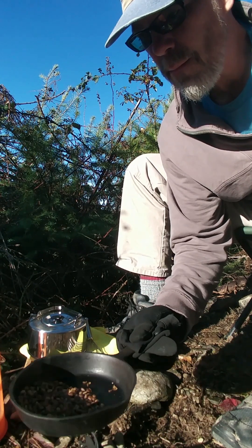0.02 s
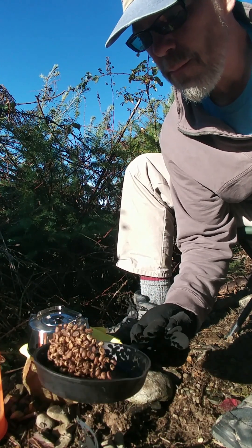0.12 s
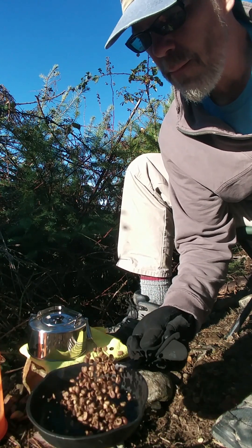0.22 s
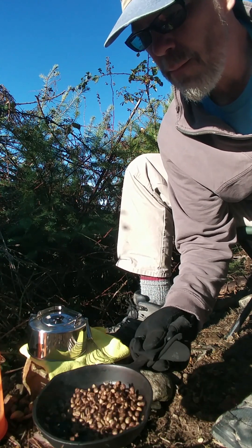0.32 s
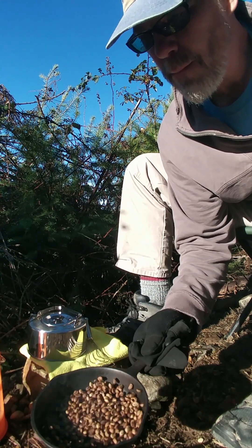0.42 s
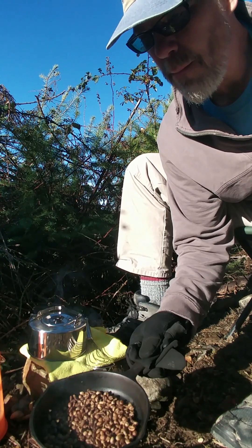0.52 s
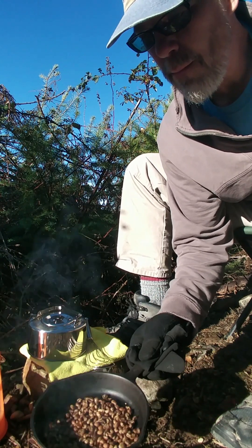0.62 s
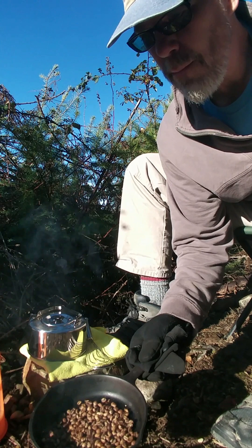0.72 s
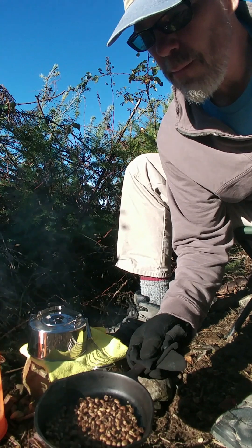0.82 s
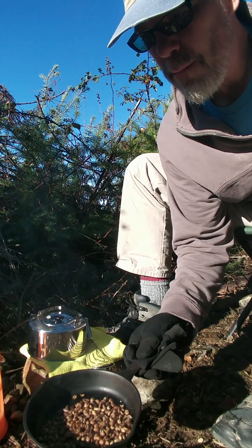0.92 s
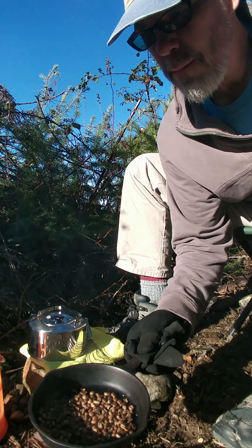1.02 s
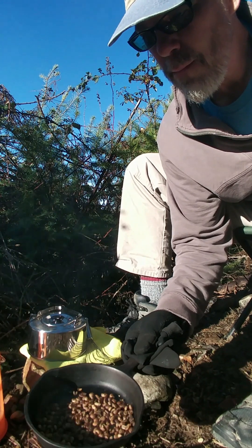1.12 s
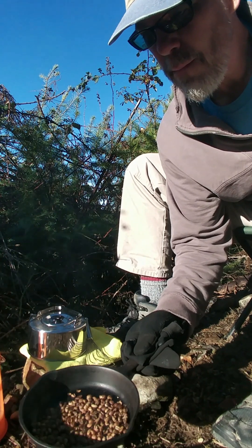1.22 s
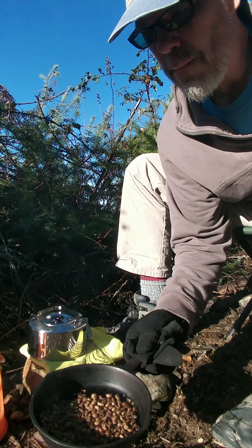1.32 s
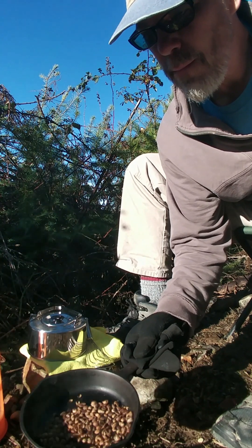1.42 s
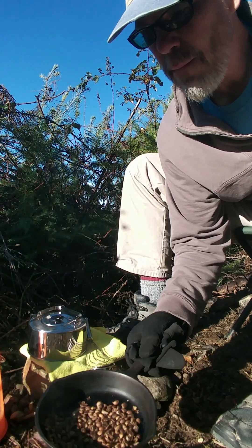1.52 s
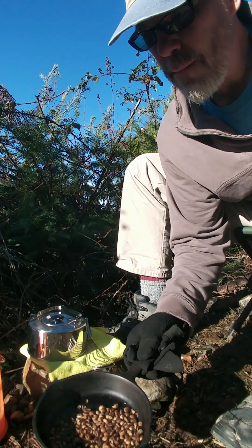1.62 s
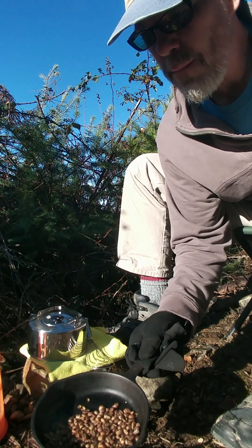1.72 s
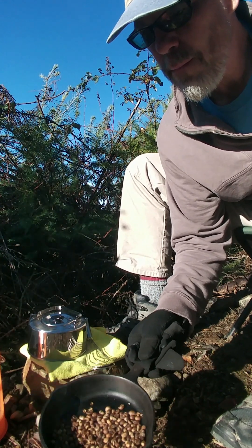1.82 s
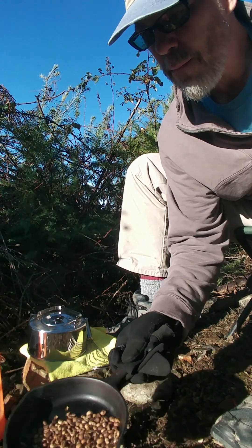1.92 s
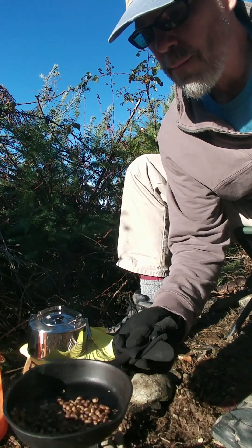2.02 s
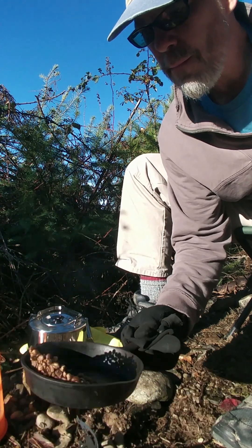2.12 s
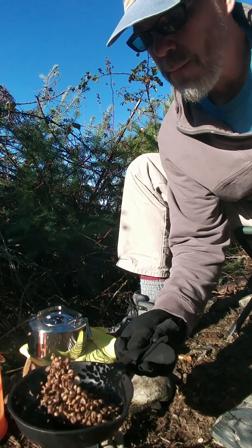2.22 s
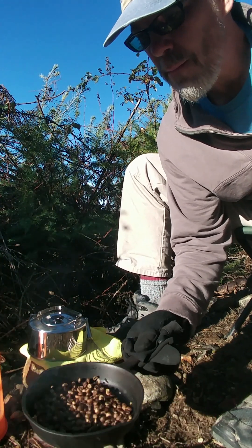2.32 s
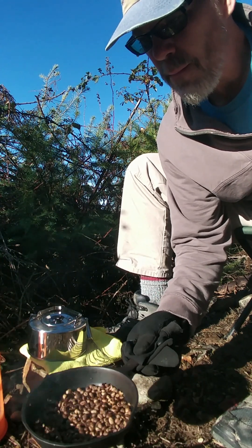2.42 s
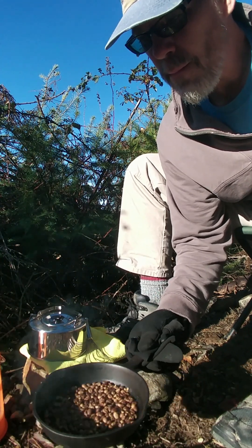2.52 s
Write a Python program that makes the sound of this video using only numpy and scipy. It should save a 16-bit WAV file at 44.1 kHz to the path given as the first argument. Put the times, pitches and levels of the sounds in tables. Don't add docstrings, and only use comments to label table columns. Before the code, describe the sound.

Coffee beans slide in a small metal pan with a bright ringing scrape, then rest; one bean cracks sharply, then a second, softer slide. Low stove rumble and faint hiss outdoors, close stereo phone microphone.

```python
import sys
import numpy as np
from scipy import signal
from scipy.fft import rfft, irfft
from scipy.io import wavfile
from scipy.ndimage import uniform_filter1d

SR = 44100
rng = np.random.default_rng(int(sys.argv[2]) if len(sys.argv) > 2 else 0)


def pcm_store(signal):
    levels = np.round(np.clip(np.atleast_2d(signal), -1, 1) * 32767)
    wavfile.write(sys.argv[1], SR, levels.astype(np.int16).T)


def volts_from_db(level):
    exponent = np.asarray(level, float) / 20
    return 10 ** exponent


N = 114660
T = np.arange(N) / SR
FREQS = np.fft.rfftfreq(N, 1 / SR)
PORT_LAG_MS = 0.3166


def noise():
    return rng.standard_normal(N)


def unit(x):
    return x / np.sqrt(np.mean(x ** 2))


def late(x, ms):
    return irfft(rfft(x) * np.exp(-2j * np.pi * FREQS * ms / 1000), N)


def ports(x, other, apart, ms):
    share = np.clip(apart, 0, 1)
    left = np.sqrt(1 - share) * x + np.sqrt(share) * other
    return np.array([late(left, ms), x])


def mode(x, hz, t60):
    pole = np.exp(2j * np.pi * hz / SR - np.log(1000) / (t60 * SR))
    return signal.lfilter([1], [1, -pole], x)


def colour(x, table):
    hz, db = np.array(table).T
    return irfft(rfft(x) * volts_from_db(np.interp(np.log(FREQS + 1), np.log(hz), db)), N)


def band(x, hz, width):
    return irfft(rfft(x) / (1 + (2 * (FREQS - hz) / width) ** 2), N)


def walk(rate):
    hold = int(SR / rate)
    steps = np.repeat(rng.standard_normal(N // hold + 1), hold)
    smooth = uniform_filter1d(uniform_filter1d(steps, hold), hold)
    return unit(smooth[:N])


def bean_motion():
    # (time [s], level [dB], place [-1 middle to 1 rim])
    slide_1 = [
        (0.192, -47.5, -2.1),
        (0.227, -33, -3.2),
        (0.251, -15.5, -0.54),
        (0.283, -21.5, 0.35),
        (0.323, -20, 1.4),
        (0.351, -25.5, 0.85),
        (0.373, -38, .3),
        (.45, -44, -0.032),
        (0.641, -63, 0.56),
    ]
    slide_2 = [
        (2.171, -61, -2),
        (2.205, -46, -3.4),
        (2.227, -27, -1.77),
        (2.263, -24, 0),
        (2.297, -20.5, -0.84),
        (2.324, -37.5, 0.6),
        (2.381, -44, -0.5),
        (2.462, -43, 0),
        (2.521, -69, 0.2),
    ]
    # (time [s], level [dB])
    creep = [
        (0, -42.5),
        (.05, -71),
        (.9, -63.5),
        (1.1, -58.5),
        (1.3, -67),
        (1.4, -58.5),
        (1.58, -60),
        (1.65, -55.5),
        (1.71, -64.5),
        (2.6, -64),
    ]
    rest_place, lead_s = 0.2, 0.0031
    ahead = T + lead_s
    rows = np.array(slide_1 + slide_2)
    moving = sum((ahead > s[0][0]) & (ahead < s[-1][0]) for s in (slide_1, slide_2))
    sliding = moving * volts_from_db(np.interp(ahead, rows[:, 0], rows[:, 1]))
    place = np.where(moving, np.interp(ahead, rows[:, 0], rows[:, 2]), rest_place)
    creeping = volts_from_db(np.interp(T, *np.array(creep).T))
    tilted = T > slide_2[0][0]
    return sliding, place, creeping, tilted


def rung(drive, hz, t60):
    evenness, window = 0.6, int(0.03 * SR)
    ring = mode(drive * noise(), hz, t60)
    expected = uniform_filter1d(mode(drive ** 2, 0, t60 / 2).real, window) + 1e-16
    actual = uniform_filter1d(abs(ring) ** 2, window) + 1e-16
    return ring * (expected / actual) ** (evenness / 2) * np.sqrt(27 / (t60 * SR))


def pan_ring(hits, sliding, place, creeping, tilted):
    # (level [dB], t60 [s], gain as the beans move to the rim [dB], left lag [ms])
    pan_modes = [(-9.5, 0.15, -4.5, 0.3), (-1.8, 0.15, -3, 0.59), (1.5, 0.22, 2.5, 0.24),
                 (-8.5, 0.27, -2.5, 0.34), (-5, 0.36, 0.7, .385), (-11, 0.055, -4, 0.41),
                 (-21, 0.21, 8, 0.18), (-9, 0.051, 0.7, 0.351), (-15, 0.15, 7, 0.371), (-10, 0.047, 0, .25),
                 (-17.5, 0.13, -5.9, 0.46), (-5, .1, 7, .323), (-5, .1, 7, .34), (-14, 0.059, 1, 0.44)]
    mode_hz = [1149, 2157, 3315, 4001, 4876, 5589, 5776, 6758, 7338, 8057, 8404, 8744, 8837, 9330]
    tilt_gain = [-2, 1.5, -1.5, -0.5, -0.5, 3.5, -1.5, .6, -1, -0.8, -1.5, -0.3, -2.5, 2]
    # (frequency [Hz], level [dB])
    ring_colour = [(1300, 0), (1650, -12), (2000, 0), (9600, 0), (10500, -18), (12000, -18), (13300, -3)]
    longest_t60, apart = 0.13, 0.12
    ring = 0
    for hz, (db, t60, rim_db, lag_ms), tilt_db in zip(mode_hz, pan_modes, tilt_gain):
        t60 = min(t60, longest_t60)
        creep_db = 0 if hz == mode_hz[2] else -5
        effort = sliding + creeping * volts_from_db(creep_db)
        blows = hits * effort * volts_from_db(db + rim_db * place + tilt_db * tilted)
        right = rung(blows, hz, t60)
        other = mode(blows * noise(), hz, t60) * np.sqrt(27 / (t60 * SR))
        left = np.sqrt(1 - apart) * right + np.sqrt(apart) * other
        left = left * np.exp(-2j * np.pi * hz * lag_ms / 1000)
        lean_db = 1 if 1500 < hz < 5200 else -1
        ring = ring + np.array([left.imag * volts_from_db(lean_db), right.imag * volts_from_db(-lean_db)])
    return volts_from_db(-2.5) * np.array([colour(r, ring_colour) for r in ring])


def bean_rattle(hits, sliding, place):
    # (frequency [Hz], density [dB per Hz])
    rattle_colour = [(1100, -26.5), (1600, -7), (2100, -61), (2700, -24.5), (5600, 5), (9000, -23),
                     (10600, -15), (13500, -12.5)]
    rim_db, patchy_db = 1, 2.5
    clatter = []
    for _ in range(2):
        level = volts_from_db(rim_db * place + patchy_db * walk(150))
        clatter.append(colour(hits * sliding * level * noise(), rattle_colour))
    return volts_from_db(-7) * ports(*clatter, 0.4, PORT_LAG_MS)


def pan():
    hits_per_s, spread_db = 9000, 1.8
    sliding, place, creeping, tilted = bean_motion()
    struck = rng.random(N) < hits_per_s / SR
    hits = unit(struck * volts_from_db(spread_db * rng.exponential(size=N)))
    return pan_ring(hits, sliding, place, creeping, tilted) + bean_rattle(hits, sliding, place)


def crack():
    # (frequency [Hz], level [dB], t60 [s])
    shell_modes = [(4500, -6, 0.0019), (8600, -10, 0.0055), (14500, -20, 0.0037), (12100, -16, .003)]
    # (delay [s], level [dB])
    echoes = [
        (.0022, -14),
        (.0143, -19),
    ]
    # (time [s], peak [dB])
    ticks = [
        (.194, -27),
        (.207, -34),
        (2.22, -32),
    ]
    # (frequency [Hz], density [dB per Hz])
    scatter = [(600, -15), (1500, -18.5), (3500, -10), (6000, -5), (8600, 1.5), (9800, -11), (10800, -11),
               (14000, -15)]
    crack_s, lag_ms, low_cut_hz = 1.2546, 0.22, 1800
    scatter_db, hold_s, scatter_t60 = -25, 0.014, 0.08
    blow = np.zeros(N)
    for s, db in [(crack_s, 0)] + [(crack_s + delay, db) for delay, db in echoes] + ticks:
        blow[int(s * SR)] = volts_from_db(db)
    pop = 0
    for hz, db, t60 in shell_modes:
        ring = mode(mode(blow, hz, t60), hz, t60 / 4).imag
        pop = pop + volts_from_db(db + 5.5) * ring * 27 / (t60 * SR)
    pop = signal.sosfilt(signal.butter(2, low_cut_hz, "high", fs=SR, output="sos"), pop)
    age = T - crack_s
    tail = (age > 0.0008) * volts_from_db(scatter_db - 60 * np.clip(age - hold_s, 0, 1) / scatter_t60)
    bushes = np.array([tail * unit(colour(noise(), scatter)) for _ in range(2)])
    return ports(pop, 0, 0, lag_ms) + bushes


def noise_band(hz, width, apart):
    x, other = (unit(band(noise(), hz, width)) for _ in range(2))
    return ports(x, other, apart, PORT_LAG_MS)


def air():
    # (frequency [Hz], width [Hz], rms [dB], share unlike in both ports [0-1])
    resonances = [(70, 66, -50.5, 0.029), (125, 86, -54, 0.07), (201, 56, -58.5, .15),
                  (353.6, 170, -50, 0.05), (448, 148, -50.5, 0.07), (798, 174, -52, .2),
                  (1118, 360, -52, .2), (1850, 2000, -61, .4), (3827, 450, -60.5, 0.86),
                  (5600, 1200, -65.5, 1), (7500, 2800, -54.5, .6), (10040, 900, -64.5, .6),
                  (13300, 4400, -59.5, .7), (15500, 500, -68.5, .7)]
    flicker_db, shade_hz, shade_db, left_db = 1.7, 1800, -6.5, -1.7
    left, right = sum(volts_from_db(db + flicker_db * walk(6)) * noise_band(hz, width, apart)
                      for hz, width, db, apart in resonances)
    bass = band(left, 0, shade_hz)
    return np.array([volts_from_db(left_db) * (bass + (left - bass) * volts_from_db(shade_db)), right])


def hum():
    # (frequency [Hz], rms [dB])
    tones = [(57, -55.5), (90, -47.5)]
    wander, flicker_db = 0.029, 2.5
    total = 0
    for hz, db in tones:
        level = volts_from_db(db + flicker_db * walk(13.73))
        phase = 2 * np.pi * np.cumsum(hz * (1 + wander * walk(10))) / SR
        total = total + level * unit(np.sin(phase))
    return total


def insects():
    # (start [s], length [s], frequency [Hz], width [Hz], level [dB])
    chirrs = [
        (0, .17, 8420, 1170, -54),
        (0.686, 0.088, 6700, 605, -55.5),
        (1.63, 0.32, 6840, 700, -59),
        (2.03, .09, 8600, 900, -57),
        (2.506, 0.13, 7050, 1500, -60.5),
    ]
    fade_s = 0.034
    total = 0
    for start, length, hz, width, db in chirrs:
        to_edge = np.minimum(T - start, start + length - T)
        swell = np.clip(to_edge / fade_s + 0.5, 0, 1)
        total = total + volts_from_db(db + 2.5 * walk(41.5)) * swell * noise_band(hz, width, 1.0)
    return total


def scene():
    return pan() + crack() + air() + hum() + insects()


def low_pass(x):
    return signal.sosfilt(signal.butter(12, 16860, fs=SR, output="sos"), x)


def record(dry):
    low_hz, top_hz = 41.5, 15900
    x = signal.sosfilt(signal.butter(3, low_hz, "high", fs=SR, output="sos"), dry)
    x = np.clip(x, -0.97, 0.97)
    x = signal.sosfilt(signal.ellip(8, 0.2, 70, top_hz, fs=SR, output="sos"), x)
    return low_pass(x)


dry = scene()
out = record(dry)
pcm_store(out)
```